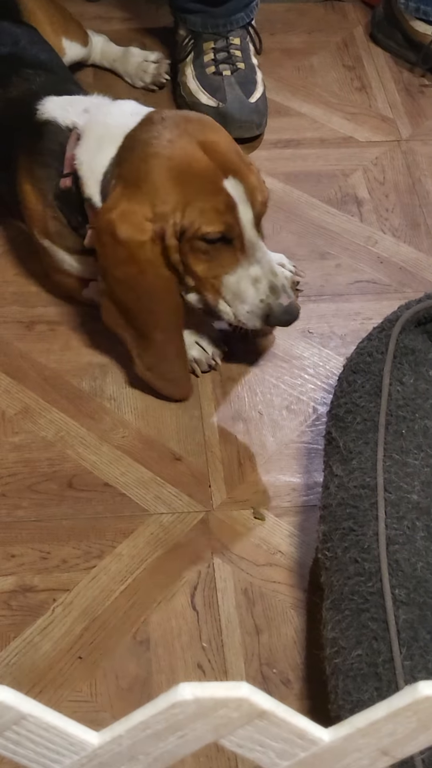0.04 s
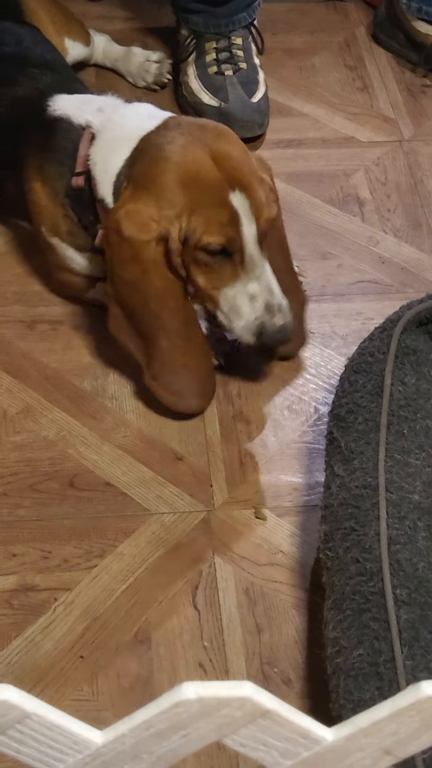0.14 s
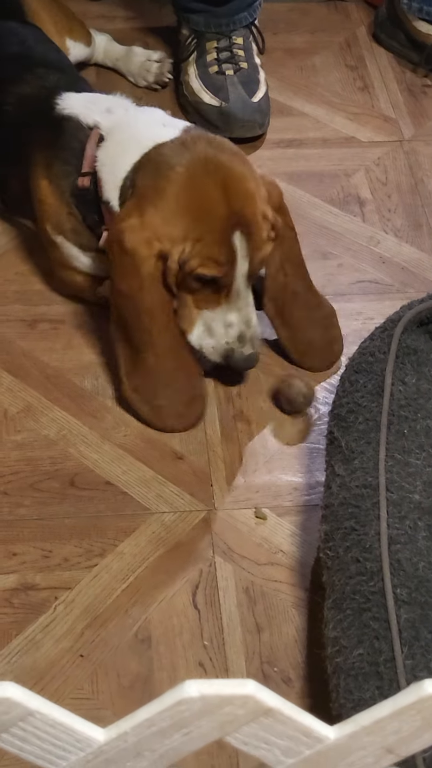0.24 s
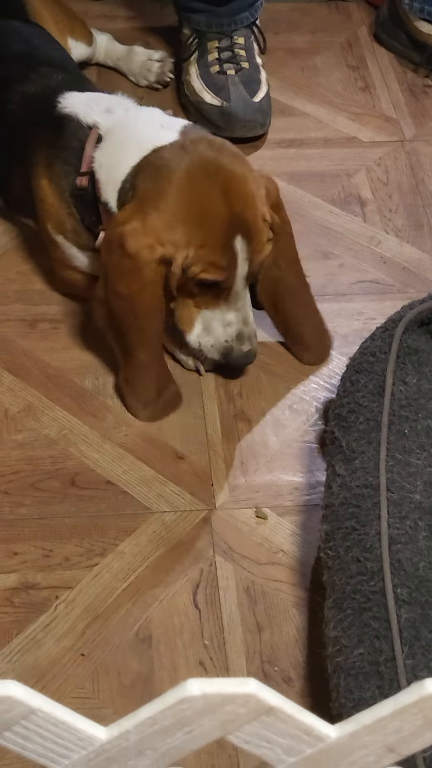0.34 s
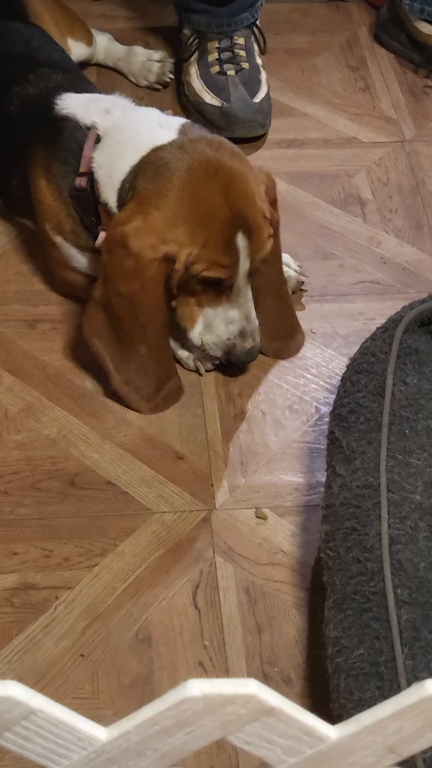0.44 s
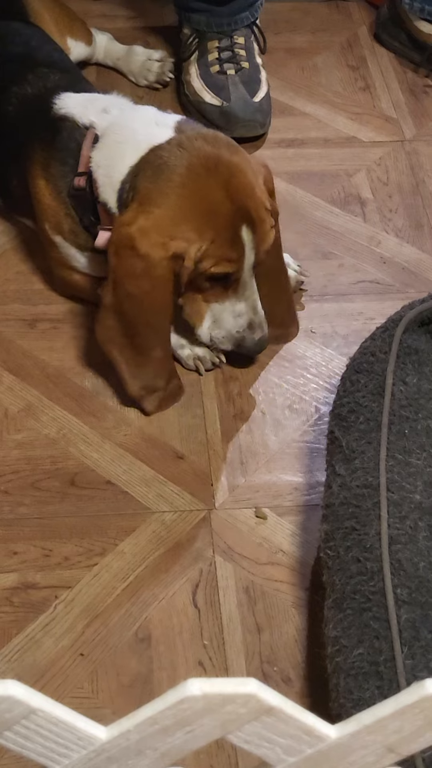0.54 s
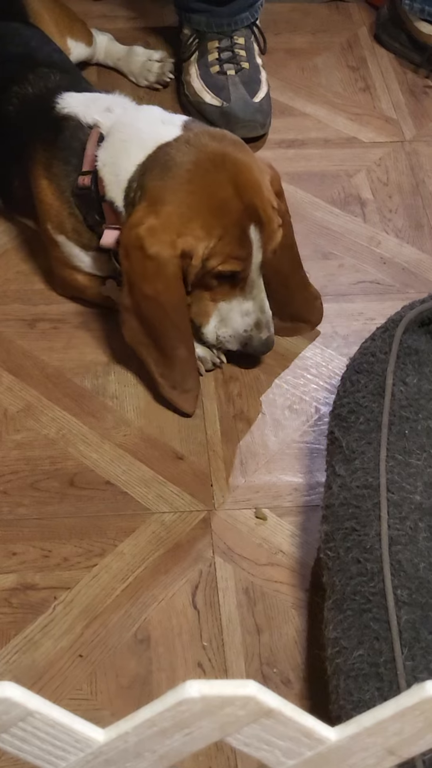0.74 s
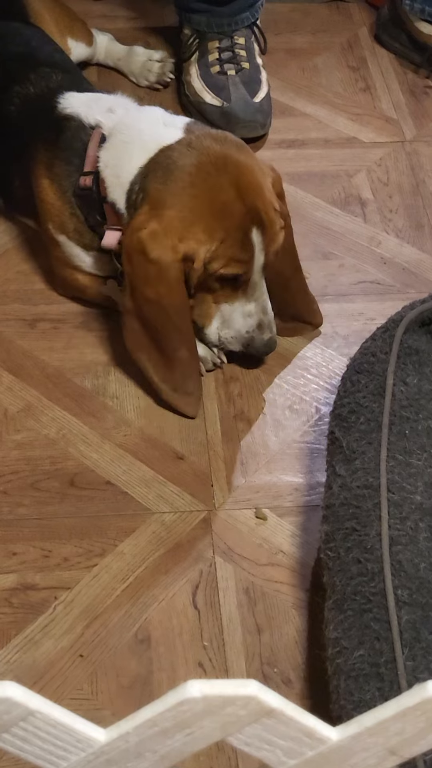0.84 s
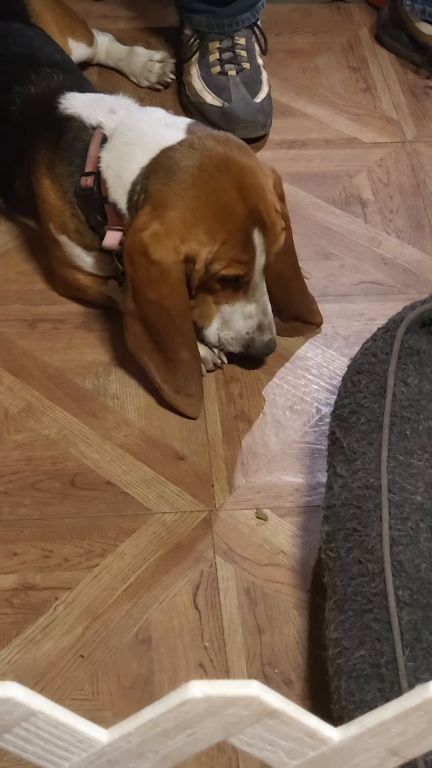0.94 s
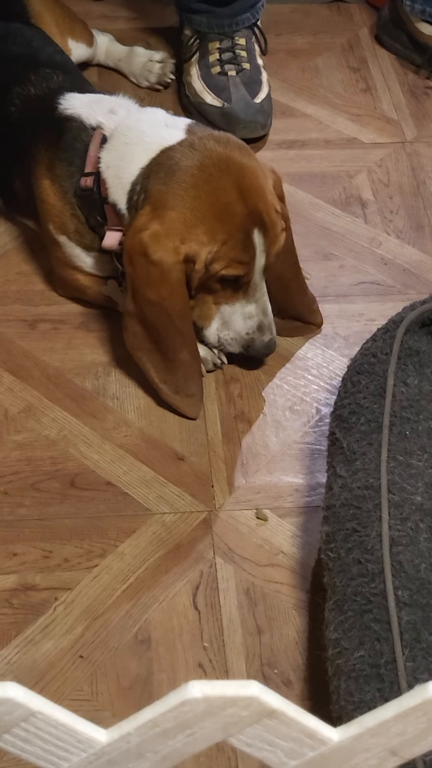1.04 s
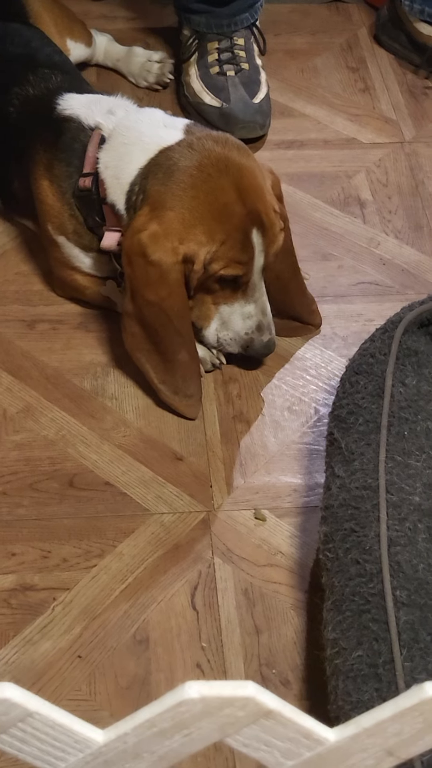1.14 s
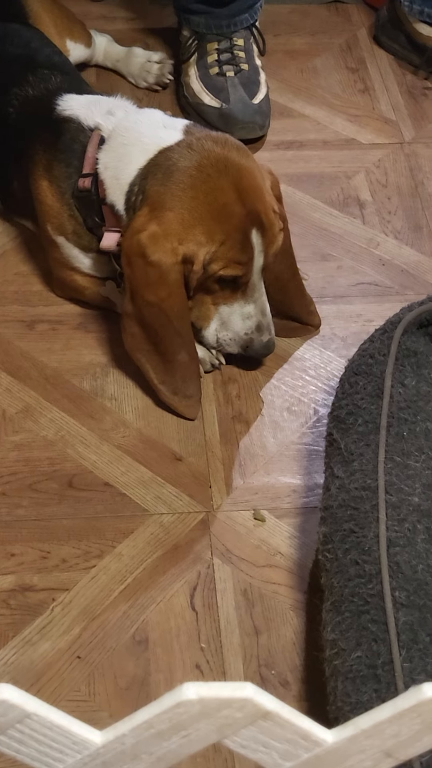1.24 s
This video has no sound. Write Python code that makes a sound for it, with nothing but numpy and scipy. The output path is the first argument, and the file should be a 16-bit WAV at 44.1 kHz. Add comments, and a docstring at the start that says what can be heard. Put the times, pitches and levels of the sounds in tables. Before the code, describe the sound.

In a quiet room with a faint hum, a small stone hits the wooden floor nearby, thudding and clicking twice, then rattles briefly to a stop. A dog's soft shuffling is barely heard afterwards.

```python
"""A low hum and hiss fill a room, and a dog shuffles, its collar and claws ticking faintly.
At 0.22 s a small rock drops on the wooden floor. Each contact pushes the boards, which thud and ring;
the hard ones also make the stone click. Nearby surfaces echo the blows, and a diffuse tail dies away.
The rock bounces once, a faint high hiss lingers after this second hit, and the rock tumbles to rest,
scraping lightly. After 1 s the dog shuffles again."""
import sys
import numpy as np
from scipy import signal
from scipy.fft import rfft, irfft
from scipy.io import wavfile
from scipy.ndimage import uniform_filter1d

SR = 44100
rng = np.random.default_rng(int(sys.argv[2]) if len(sys.argv) > 2 else 0)


def materialize(psi):
    """Save the field psi as 16-bit PCM at rate SR to the path in sys.argv[1].

    A 1-D psi becomes a single channel; in a 2-D psi each row is a channel.
    """
    bounded = np.clip(np.atleast_2d(psi).T, -1, 1)
    quanta = np.round(bounded * 32767).astype(np.int16)
    wavfile.write(sys.argv[1], SR, quanta)


N = 57330
T = np.arange(N) / SR
HZ = np.maximum(np.arange(N + 1) * SR / (2 * N), 1e-3)  # frequencies of the padded spectrum


def undb(db):
    """Amplitude ratio of a level in decibels."""
    return 10 ** (np.asarray(db) / 20)


def stereo(db):
    """Left and right gains for a level difference, left minus right."""
    return undb(np.array([db, -db]).reshape(2, -1) / 2)


def spectrum(x):
    """Fourier transform, padded so that a product of spectra is a convolution."""
    return rfft(x, 2 * N)


def sound(spec):
    """Inverse transform of a padded spectrum."""
    return irfft(spec, 2 * N)[..., :N]


def delay(s):
    """A delay is a phase lag proportional to frequency."""
    return np.exp(-2j * np.pi * HZ * s)


def lowpass(hz, order=2):
    """Response of a maximally flat causal low-pass."""
    return signal.freqs(*signal.butter(order, 1, analog=True), HZ / hz)[1]


def band(hz, width_hz):
    """Response of a bell-shaped band."""
    return np.exp(-2 * ((HZ - hz) / width_hz) ** 2)


def colour(points):
    """Spectral envelope through (frequency_hz, level_db) points, rolled off at both ends."""
    hz, db = np.array(points).T
    envelope = undb(np.interp(np.log(HZ), np.log(hz), db))
    return envelope * abs(lowpass(hz[-1] * 1.2, order=4)) * HZ / np.hypot(HZ, hz[0])


def noise(gain, width):
    """Filtered stereo noise with a mid signal of unit power; width is side over mid."""
    white = spectrum(rng.standard_normal((2, N)))
    mid, side = sound(white * gain) / np.sqrt(np.mean(gain ** 2))
    return mid + width * side * np.array([[1], [-1]])


def wander(per_s):
    """Smoothed random steps, with a spread of order 1."""
    hold = int(SR / per_s)
    steps = np.repeat(rng.standard_normal(N // hold + 2), hold)
    return uniform_filter1d(uniform_filter1d(steps, hold), hold)[:N]


def decay(t60_s):
    """Exponential damping: the level falls 60 dB in t60_s."""
    return np.exp(-np.log(1000) * T / t60_s)


def ring(modes, rise_s=0):
    """Modal response as a spectrum: damped cosines swell while the wave spreads through the body."""
    swell = 1 - np.exp(-T / rise_s) if rise_s else 1
    motion = sum(-stereo(pan_db) * undb(db) * decay(t60_s) * np.cos(2 * np.pi * hz * T)
                 for hz, db, t60_s, pan_db in modes)
    return spectrum(swell * motion)


def swells(rows, width):
    """Bands of noise rise and fall under bell-shaped envelopes."""
    return sum(undb(db) * np.exp(-((T - peak_s) / half_s) ** 2) * noise(band(hz, width_hz), width)
               for peak_s, half_s, db, hz, width_hz in rows)


def hum():
    """Random modulation of frequency and amplitude makes a low tone waver."""
    pitch_hz, drift, level_db, waver_db = 59.5, .025, -52.5, 1.8
    phase = 2 * np.pi * np.cumsum(pitch_hz * (1 + drift * wander(per_s=12.4))) / SR
    return np.sqrt(2) * undb(level_db + waver_db * wander(per_s=5.3)) * np.sin(phase)


def room_noise():
    """Stationary coloured noise: dull room air and a thin hiss."""
    # spectrum of the air: frequency_hz, relative_density_db
    air = [(15, -58.5), (25, -46), (42, -12.5), (64, -6.5), (179, -24), (213, -16), (253, -25),
           (323, -28.5), (1600, -60.5), (2080, -88), (3520, -120)]
    # spectrum of the hiss: frequency_hz, relative_density_db
    hiss = [(1200, -3.5), (1800, -3), (2100, 7.5), (2650, 4), (3100, -13.5), (5000, -16.5), (9000, -22.5),
            (14500, -17), (16000, -15.5)]
    return undb(-53) * noise(colour(air), width=.45) + undb(-74) * noise(colour(hiss), width=1)


def dog_shuffles():
    """Sliding friction gives soft swells of noise as the dog shifts."""
    # movements of the dog: peak_s, half_length_s, level_db, centre_hz, width_hz
    shuffles = [(0.059, 0.071, -75.5, 13770, 4320), (0.103, 0.06, -73.5, 674, 201),
                (1.02, 0.022, -76.5, 259, 190), (1.122, 0.014, -55, 269, 215),
                (1.162, 0.027, -66.5, 590, 346), (1.247, 0.025, -54, 225, 161)]
    return swells(shuffles, width=.28)


def dog_ticks():
    """Light impacts give noise transients: a fast decay and a short reverberant tail."""
    # ticks of collar and claws: start_s, level_db, centre_hz, width_hz
    ticks = [(.074, -61.5, 12400, 4000), (0.097, -59.5, 3670, 769), (.096, -63.5, 5250, 1370),
             (.172, -67, 9500, 5935)]
    decay_s, tail_s, tail_db = .002, .019, -9
    out = 0
    for start_s, db, hz, width_hz in ticks:
        age = np.maximum(T - start_s, 0)
        fade = (T > start_s) * (np.exp(-age / decay_s) + undb(tail_db) * np.exp(-age / tail_s))
        out = out + undb(db) * fade * noise(band(hz, width_hz), width=.6)
    return out


def rock_impacts():
    """Linear superposition: contact pulses drive wood and stone; harder contacts carry more treble."""
    # contacts of the rock: start_s, level_db, force_corner_hz, bass_db, floor_ring_db,
    # hollow_ring_db, click_db, click_corner_hz
    contacts = [(0.2160, -4.5, 1106, 5, -7, -29.5, -4, 13400),
                (0.2904, -5, 1390, -15.5, -8.5, -7, -13.5, 5230),
                (0.3365, -25, 850, 11.5, -10.5, -35, -31.5, 4640),
                (0.3729, -33, 985, -1.5, 7.5, -2, -31.5, 3160),
                (0.3950, -16.5, 1051, 1, -5.5, 2.5, -29.5, 2780),
                (0.4300, -24, 895, 5, -2, 2.5, -35.5, 2354), (0.457, -24, 509, -1.5, -12, -14.5, -36, 1970),
                (0.645, -52, 694, 5, 1.5, -25, -68, 2000)]
    bass_hz = 387.3
    push = floor_push = hollow_push = tap = 0
    for start_s, db, corner_hz, bass_db, floor_db, hollow_db, click_db, click_hz in contacts:
        bass_shelf = 1 + (undb(bass_db) - 1) * lowpass(bass_hz, order=1)
        force = undb(db) * delay(start_s) * lowpass(corner_hz, order=5) * bass_shelf
        push += force
        floor_push += undb(floor_db) * force
        hollow_push += undb(hollow_db) * force
        tap += undb(click_db) * delay(start_s) * lowpass(click_hz)
    arrival = np.array([delay(0), delay(.00016)])  # the sound reaches the left side first
    paths = arrival * direct_balance() + early_reflections()
    boards_tail, stone_tail = reverberation()
    thud = push * (board_thud() * paths + boards_tail)
    ringing = floor_resonance(floor_push, hollow_push) * arrival
    click = tap * (stone_click() * paths + stone_tail)
    return sound(thud + ringing + click)


def board_thud():
    """Heavy damping makes the boards right under the rock answer a push with a thud."""
    # local modes of the boards: pitch_hz, level_db, t60_s, left_minus_right_db
    modes = [(260, -1, .011, 0), (480, -8, .01, 0), (830, 0, .008, 0)]
    return undb(1.5) * ring(modes, rise_s=.0004)


def floor_resonance(floor_push, hollow_push):
    """Free vibration: the floor and a hollow spot in it ring on at their natural frequencies."""
    # modes of the floor: pitch_hz, level_db, t60_s, left_minus_right_db
    floor_modes = [(66.27, -9, 0.6, 2), (126.9, -8, 0.15, -3), (192.7, -5, 0.28, -2.5),
                   (268.3, 1.5, 0.15, -1), (304, -10.5, 0.17, -8.5), (390.4, 3.5, 0.16, -3),
                   (435.4, -1, 0.083, -5), (451.6, -16, 0.32, 5), (557.2, 6, 0.087, 5.5),
                   (645, -7, 0.083, -15.5), (792, -3, 0.073, 12.5), (1047, -5.5, 0.056, 11),
                   (1169, -6.5, 0.098, 12), (1297, -16, .11, 0)]
    # mode of the hollow spot: pitch_hz, level_db, t60_s, left_minus_right_db
    hollow_modes = [(832, -15, .12, 6)]
    floor_db, rise_s = -9.5, .001
    floor = floor_push * undb(floor_db) * ring(floor_modes, rise_s)
    return floor + hollow_push * ring(hollow_modes, rise_s)


def stone_click():
    """Stiff bodies have high modes; their brief ringing is heard as a click."""
    # modes of the stone and the hard surface: pitch_hz, level_db, t60_s, left_minus_right_db
    modes = [(1950, 1.5, 0.04, -1), (2163, -7.5, .04, 9), (2600, -7.5, .025, 6.5), (3270, -7.5, .018, 7),
             (4520, -4, 0.0035, 6.5), (5295, -12, 0.0055, 13.5), (7200, 2.5, 0.0046, 5.5),
             (13080, -9, 0.0038, 7.5), (15000, -6.5, .003, -4.5)]
    return undb(-26) * ring(modes)


def direct_balance():
    """A level difference that varies with frequency places the direct sound mostly on the left."""
    # balance of the direct sound: frequency_hz, left_minus_right_db
    balance = [(250, 2.5), (500, -17.5), (1000, 10.5), (4000, 17.5), (7000, 11), (13000, -8.5)]
    hz, db = np.array(balance).T
    return stereo(np.interp(np.log(HZ), np.log(hz), db))


def early_reflections():
    """Reflection from nearby surfaces returns delayed, weaker and duller copies."""
    # first echoes: left_delay_s, right_delay_s, level_db
    echoes = [(.0035, .0031, -23), (.0110, .0113, -17), (.0127, .0131, -13), (.0160, .0164, -18)]
    copies = sum(undb(db) * np.array([delay(left_s), delay(right_s)]) for left_s, right_s, db in echoes)
    return lowpass(hz=3730, order=1) * copies


def reverberation():
    """The diffuse field of boards and stone decays fast, then slowly, and is wider in the treble."""
    # bands of the room's tail: centre_hz, boards_db, stone_db, t60_s
    bands = [(100, -24.5, -72.5, .45), (261.5, -22.5, -72, 0.48), (500, -19.5, -68, 0.42),
             (1013, -26.5, -48.5, 0.16), (1860, -17.5, -33, 0.17), (4016, -43.5, -40.5, 0.15),
             (7460, -47, -59, 0.32), (8300, -57, -68.5, 0.238), (11300, -50.5, -58, 0.18),
             (13580, -50.5, -51.5, 0.093)]
    early_db, early_t60_s, late_db = 6, .08, -11.5
    rise_s, low_cut_hz, widening_hz = .005, 73, 480
    log_centres = np.log([row[0] for row in bands])
    low_cut = abs(1 - lowpass(low_cut_hz, order=1)) ** 4
    build_up = 1 - np.exp(-(T / rise_s) ** 2)
    boards = stone = 0
    for (hz, boards_db, stone_db, t60_s), selector in zip(bands, np.eye(len(bands))):
        power_share = np.interp(np.log(HZ), log_centres, selector) * low_cut  # overlapping triangles
        fade = undb(early_db) * decay(early_t60_s) + undb(late_db) * decay(t60_s)
        tail = noise(np.sqrt(power_share), width=1 / (1 + (widening_hz / hz) ** 2)) * fade * build_up
        boards += undb(boards_db) * tail
        stone += undb(stone_db) * tail
    return spectrum(boards), spectrum(stone)


def hiss_and_scrape():
    """Random modulation roughens a faint high hiss after the second hit and the rolling rock's scrape."""
    # two scrapes, then the lingering hiss: peak_s, half_length_s, level_db, centre_hz, width_hz
    bands = [(.385, 0.047, -71.5, 3700, 1500), (.36, 0.084, -82, 6900, 1300),
             (0.332, .11, -78.5, 17000, 11000)]
    grit_db = 3.5
    return swells(bands, width=.68) * undb(grit_db * wander(per_s=300))


def scene():
    """The sound pressures of rock, dog and room add."""
    return rock_impacts() + hiss_and_scrape() + dog_shuffles() + dog_ticks() + hum() + room_noise()


def record(dry):
    """Band limiting removes the deepest bass and the highest treble."""
    low_hz, top_hz = 25, 16000
    thinned = signal.sosfilt(signal.butter(1, low_hz, "high", fs=SR, output="sos"), dry)
    return signal.sosfilt(signal.ellip(8, .2, 70, top_hz, fs=SR, output="sos"), thinned)


dry = scene()
out = record(dry)
materialize(out)
```